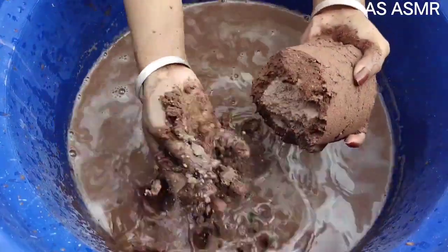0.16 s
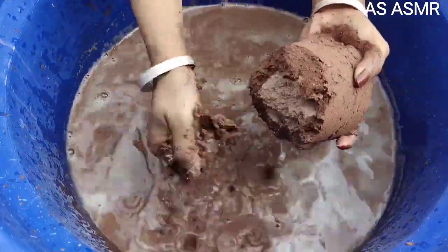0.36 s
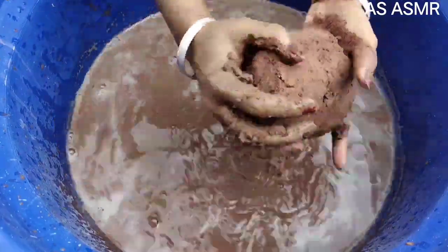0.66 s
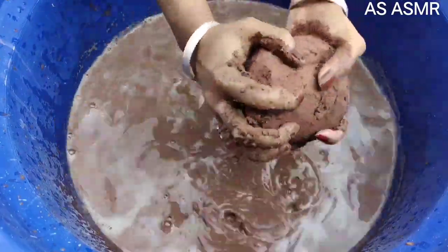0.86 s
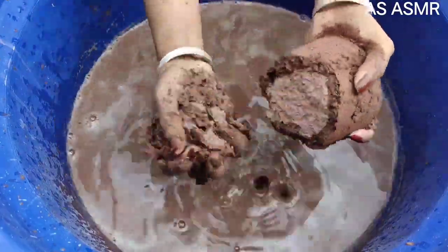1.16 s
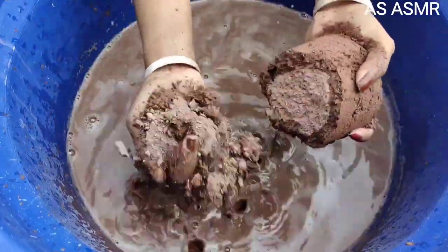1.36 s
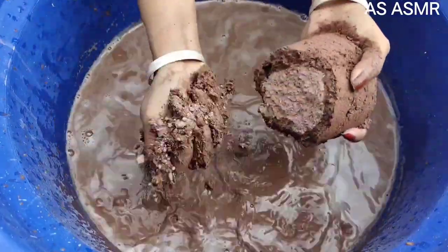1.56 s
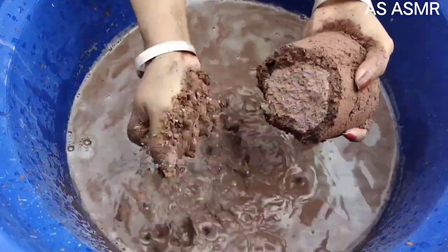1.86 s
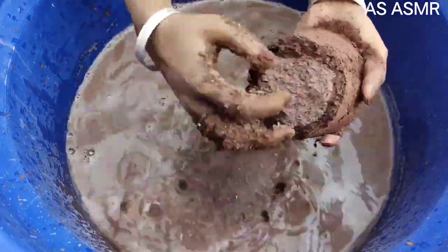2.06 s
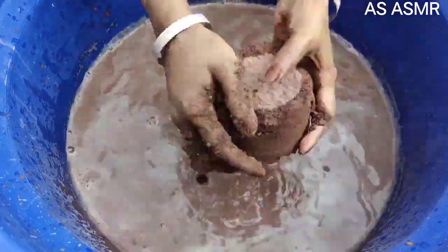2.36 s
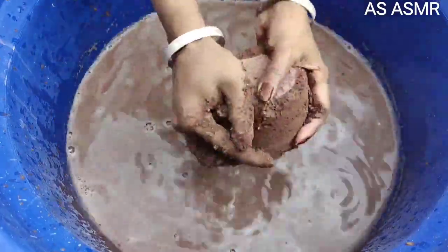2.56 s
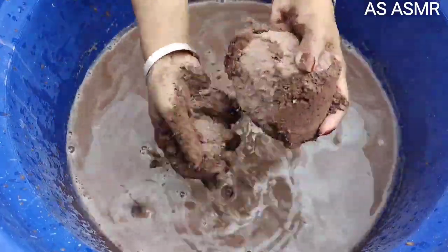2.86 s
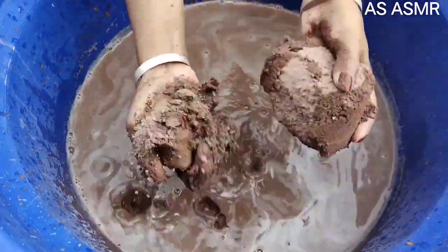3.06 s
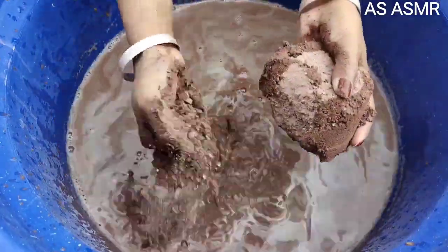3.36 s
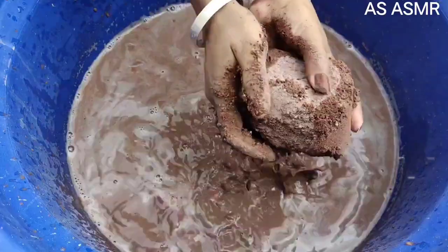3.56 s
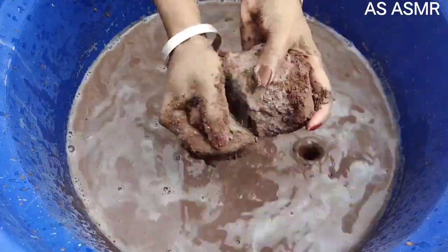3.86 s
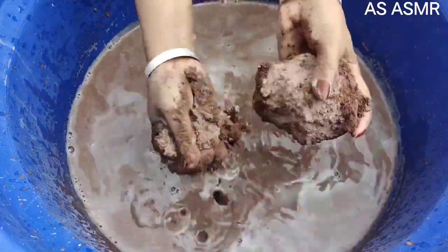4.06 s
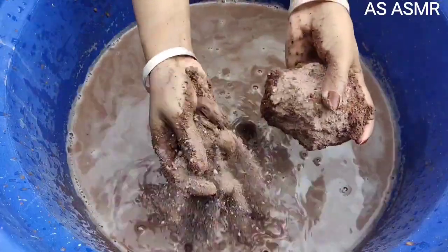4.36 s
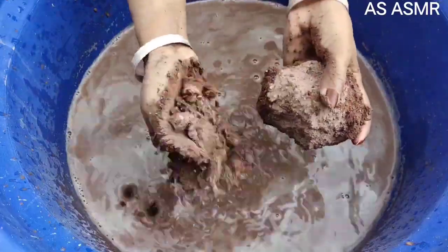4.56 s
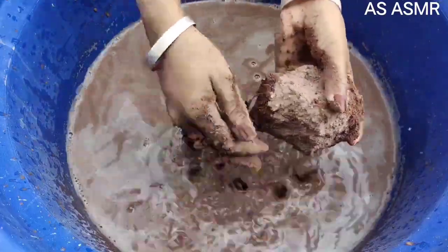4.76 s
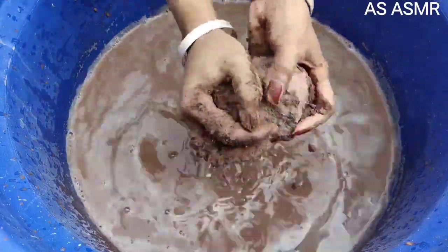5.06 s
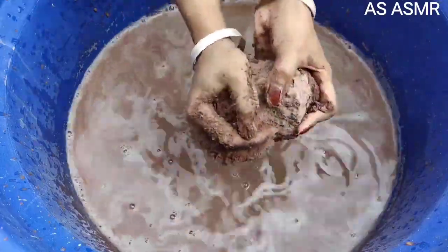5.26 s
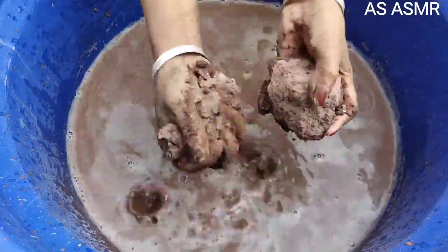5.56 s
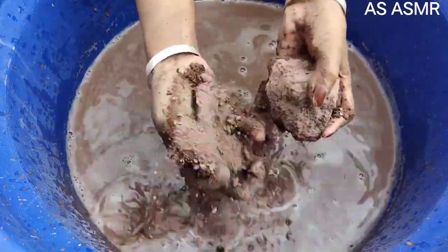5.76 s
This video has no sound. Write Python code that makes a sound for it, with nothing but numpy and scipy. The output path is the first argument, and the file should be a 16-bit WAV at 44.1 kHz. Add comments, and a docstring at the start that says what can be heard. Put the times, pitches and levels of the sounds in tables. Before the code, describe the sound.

Close, wet splatters and plops come in repeated bursts as bits of soil are broken off by hand and fall into a tub of water. Each handful brings small splashes, short ringing bubbles and a gritty trickle, then thins to soft crumbling and an occasional quick finger scrape before the next one falls. The plastic tub rings slightly, over a quiet distant rumble.

```python
"""Wet slaps and plops: lumps of wet soil are crumbled by hand over a plastic tub of muddy water.
Crumbs slap the surface and throw spray, and the air they drag under rings as short bubbles.
Grit hisses between the fingers, which now and then scrape over the lump. The air in the tub
rings along with all of it, over a low, steady rumble from afar."""
import sys
import numpy as np
from scipy import signal
from scipy.fft import rfft, irfft, next_fast_len
from scipy.io import wavfile
from scipy.ndimage import uniform_filter1d, map_coordinates

SR = 44100
rng = np.random.default_rng(int(sys.argv[2]) if len(sys.argv) > 2 else 0)


def master_out(mix):
    """Clip the mix to full scale and print it as 16-bit PCM to the path in sys.argv[1]."""
    frames = np.transpose(np.atleast_2d(mix))
    ceiling = np.clip(frames, -1, 1)
    pcm = np.round(ceiling * 32767).astype(np.int16)
    wavfile.write(sys.argv[1], SR, pcm)


N = 260631


# Crumbs hitting the water: start_s, level_db, pitch_hz, spray_db (added to level_db for the spray)
CRUMB_HITS = [(0.025, -17.5, 7400, -3), (0.028, -19, 6400, -7), (0.046, -17.5, 3160, -34),
              (0.06, -17.5, 3030, -11), (0.1018, -17, 3680, -7.5), (0.2086, -14, 3460, -8),
              (0.2588, -24, 5560, -3), (0.297, -20.5, 4600, -3.5), (0.3332, -17, 5000, -10.5),
              (0.365, -18.5, 3340, -30), (0.3879, -16, 3300, -19), (0.4391, -27, 5400, -10),
              (0.4476, -15, 6040, -10), (0.4798, -19, 2780, -26), (0.5199, -15, 5000, -12.5),
              (0.5754, -27, 4100, -9), (0.607, -23, 3900, -2), (0.634, -24, 2420, 1),
              (0.6859, -19, 6160, -3.5), (0.7476, -31, 3500, -4), (0.9112, -26, 3450, -39),
              (1.011, -29, 6000, -19), (1.2605, -31, 7040, -20), (1.3215, -23.5, 5540, -5),
              (1.3274, -19.5, 9100, -12.5), (1.4132, -21, 8900, -12), (1.4298, -13, 4530, -21),
              (1.4667, -15.5, 4800, -10), (1.4936, -18.5, 5250, -7), (1.5298, -15, 4800, -32),
              (1.5384, -26, 5500, -1), (1.5445, -18, 5800, -29), (1.6047, -16.5, 5070, -35),
              (1.7696, -17, 1970, -31.5), (1.7978, -12.5, 2380, -11), (1.8056, -24, 2400, -30),
              (1.8762, -14, 5000, -17), (1.9013, -14, 6660, -14.5), (1.927, -22, 6500, -16),
              (1.94, -16, 6700, -15), (1.9895, -16, 3920, -12), (2.0224, -16, 9400, -22),
              (2.058, -13.5, 8050, -11), (2.067, -22, 6500, -23), (2.1606, -23, 3680, -6),
              (2.177, -24.5, 3500, 0), (2.2209, -23, 3500, -17), (2.3207, -28, 7100, -14),
              (2.3797, -24.5, 3800, -8), (2.9543, -23.5, 2520, -10), (3.165, -32, 2980, 0.5),
              (3.2017, -22.5, 2880, -27), (3.2217, -17, 4600, -1), (3.228, -32, 6000, -28),
              (3.2482, -22.5, 7900, -36), (3.275, -28, 7000, -6), (3.314, -24, 3930, -15),
              (3.331, -27, 10000, -11), (3.338, -20.5, 4150, -2), (3.391, -19, 3960, -4),
              (3.47, -26, 9000, -17), (3.486, -20.5, 3120, -21), (3.5455, -20, 6600, -7),
              (3.577, -23, 4240, -15), (3.621, -23, 7000, -8), (3.6377, -24, 5300, 5),
              (3.6588, -30, 2700, -4), (3.678, -16, 4300, -8.5), (3.73, -24.5, 3900, -0.5),
              (4.0227, -21, 6400, -15), (4.4074, -15.5, 2530, -38), (4.4698, -21, 2470, -22),
              (4.5187, -24, 3620, -15), (4.5365, -17.5, 2650, -4.5), (4.572, -18, 2600, -32),
              (4.621, -30, 3900, -0.5), (4.707, -17, 3650, -8.5), (4.7704, -21, 3200, -7.5),
              (4.8108, -25.5, 4870, -10), (4.836, -27, 4000, -6), (4.8486, -18, 3900, -10),
              (4.8865, -18, 3600, -2.5), (4.912, -30, 5960, -2), (4.931, -16, 6600, -12),
              (4.9515, -18, 3570, -13), (4.9675, -22, 3180, -1), (4.992, -24, 5900, -9),
              (5.019, -23.5, 2480, -6), (5.074, -23.5, 5100, -10.5), (5.21, -31, 2080, -13),
              (5.618, -30, 2430, -7), (5.6981, -21.5, 7500, -23), (5.7552, -28, 4950, -3),
              (5.8388, -22, 3570, -5), (5.854, -30, 3400, -21), (5.884, -19, 8800, -39),
              (5.901, -12.5, 2310, -40)]

def slaps():
    """A crumb hits the water: a sharp snap, a low push, a short ring, then a burst of spray."""
    start_s, level_db, pitch_hz, spray_db = np.transpose(CRUMB_HITS)[:, :, None]
    starts = start_s[:, 0]
    t = np.arange(200) / SR
    burst = amp(-60 * t / 0.0012) * rng.standard_normal((len(starts), len(t)))
    crack = place(starts, amp(level_db) * burst / np.linalg.norm(burst, axis=1, keepdims=True))
    pulse_time = t * pitch_hz * 4.8  # a brighter crumb makes a shorter pulse
    pulse = pulse_time * (pulse_time - 2) * np.exp(-pulse_time)
    snap = place(starts, amp(level_db + 4.5) * pulse) + amp(14) * crack
    push = filtered(abs(crack), lambda hz: resonance(hz, pitch_hz=270, width_hz=280, gain_db=16.5))
    ring = air_pockets(starts, level_db[:, 0] + 6.5, pitch_hz[:, 0], cycles=0.0047 * pitch_hz[:, 0],
                       rise=0.11, waver=1.0, samples=300)
    t = np.arange(2000) / SR
    fade_in = 1 - np.exp(-t / 0.002)
    spray = place(starts, amp(level_db + spray_db + 9.5 - 60 * t / 0.019) * fade_in)
    droplets = amp(3.5 * wobble(600))
    return snap + push + ring + spray * droplets * spray_noise()


# Air trapped under the water: start_s, level_db, pitch_hz
TRAPPED_AIR = [(0.029, -25, 1330), (0.045, -18, 255), (0.047, -16, 847), (0.0805, -19.5, 890),
               (0.0845, -11.5, 630), (0.101, -22, 2000), (0.102, -16, 536), (0.208, -17, 745),
               (0.259, -18.5, 1075), (0.295, -15.5, 450), (0.296, -17, 990), (0.368, -14, 1170),
               (0.389, -12.5, 776), (0.448, -19, 1220), (0.479, -25, 2170), (0.519, -12.5, 880),
               (0.536, -19.5, 930), (0.559, -13.5, 1200), (0.607, -12.5, 735), (0.62, -18, 1350),
               (0.63, -17, 1310), (0.634, -15, 540), (0.635, -11.5, 2150), (0.649, -19.5, 1840),
               (0.686, -21.5, 575), (0.747, -21, 600), (0.9105, -10.5, 785), (1.429, -17, 574),
               (1.437, -17, 625), (1.492, -20, 1030), (1.538, -20, 795), (1.564, -16.5, 920),
               (1.655, -20.5, 1460), (1.761, -25, 1720), (1.771, -12, 1726), (1.7975, -12, 810),
               (1.804, -12.5, 860), (1.846, -30, 2250), (1.861, -23, 3830), (1.881, -25, 2300),
               (1.918, -17, 950), (1.936, -21, 1660), (1.964, -19.5, 1740), (1.989, -22.5, 1450),
               (2.009, -25, 1190), (2.04, -23, 1030), (2.121, -11, 582), (2.165, -19.5, 3100),
               (2.185, -20.5, 910), (2.227, -18.5, 1180), (2.23, -19.5, 3070), (2.241, -15, 594),
               (2.473, -30.5, 1970), (2.927, -18, 1730), (2.951, -18, 920), (2.954, -17.5, 565),
               (3.049, -29.5, 1400), (3.068, -21.5, 1015), (3.226, -22, 1950), (3.34, -16, 916),
               (3.391, -22, 1850), (3.452, -20.5, 990), (3.486, -20.5, 945), (3.514, -21.5, 2000),
               (3.524, -25, 2840), (3.534, -20, 1370), (3.545, -15, 467), (3.57, -22, 1560),
               (3.646, -17.5, 1090), (3.654, -16, 1560), (3.677, -12.5, 695), (3.707, -21.5, 2200),
               (3.73, -15.5, 1600), (3.767, -21.5, 1870), (4.022, -22.5, 1126), (4.096, -28, 3100),
               (4.249, -27.5, 1790), (4.335, -26, 1800), (4.408, -13, 647), (4.409, -15, 830),
               (4.46, -24, 1770), (4.469, -23, 1320), (4.487, -21, 1080), (4.518, -20, 1450),
               (4.537, -15.5, 1730), (4.571, -18, 1830), (4.722, -20.5, 572), (4.77, -13.5, 2340),
               (4.837, -20.5, 2830), (4.848, -17.5, 1440), (4.872, -27, 2580), (4.887, -15.5, 1054),
               (4.887, -14.5, 1900), (4.888, -18.5, 530), (4.931, -24, 1260), (4.94, -14, 970),
               (4.953, -17, 1830), (4.967, -23, 900), (5.017, -14, 845), (5.019, -18, 1750),
               (5.208, -24.5, 1000), (5.245, -21.5, 1236), (5.578, -32.5, 1300), (5.698, -24.5, 1860),
               (5.839, -19.5, 1950), (5.855, -19, 3130), (5.881, -22, 270), (5.9, -19, 486),
               (5.901, -17, 1170)]

def bubbles():
    """Each large air pocket plops, with a ragged puff of churned water."""
    start_s, level_db, pitch_hz = np.transpose(TRAPPED_AIR)
    cycles = 20.6 * (pitch_hz / 1000) ** 0.6  # higher bubbles ring for more cycles
    plop = air_pockets(start_s, level_db, pitch_hz, cycles, rise=0.055, waver=0.53, samples=2200)
    plop_loudness = abs(signal.hilbert(plop, next_fast_len(N))[:N])
    churn = amp(-19) * plop_loudness * amp(3.1 * wobble(350)) * spray_noise()
    # a smaller pocket breaks off and rings along
    lag, higher = rng.random((len(start_s), 2)).T
    small_plop = air_pockets(start_s + 0.005 * lag, level_db - 5.5, pitch_hz * (1.255 + 1.35 * higher),
                             0.74 * cycles, rise=0.11, waver=0.67, samples=1200)
    return plop + churn + small_plop


def air_pockets(start_s, level_db, pitch_hz, cycles, rise, waver, samples):
    """Fading tones that climb as a pocket nears the surface and waver as its wall shakes."""
    turns = pitch_hz[:, None] * np.arange(samples) / SR
    age = turns / cycles[:, None]  # at age 1 the tone has faded by 60 dB
    swell = 1 - np.exp(-turns / 0.16)
    shake = waver * np.sin(2 * np.pi * (turns / 3.72 + rng.random((len(start_s), 1))))
    phase = 2 * np.pi * turns * (1 + rise * np.minimum(age, 1)) + shake
    return place(start_s, amp(level_db[:, None] - 60 * age) * swell * np.sin(phase))


# The tone of spray, from low to high: pitch_hz, level_db
SPRAY_TONE = [(200, -12), (800, 0), (2000, 2.5), (5000, 0.5), (9000, -6.5), (15000, -20.5)]

def spray_noise():
    """The wet hiss used for spray, churned water and scrapes."""
    return noise(SPRAY_TONE)


# Grit dropped or rubbed loose in one go: start_s, end_s, start_level_db, end_level_db
GRIT_POURS = [(0.019, 0.483, -37, -36), (0.566, 0.658, -35.5, -35.5), (0.77, 1.15, -45, -47.5),
              (1.234, 1.453, -40.5, -35), (1.552, 1.725, -31.5, -39.5), (1.754, 2.095, -40.5, -35),
              (2.16, 2.246, -35.5, -38.5), (2.293, 2.526, -46.5, -46), (2.603, 2.94, -48.5, -45.5),
              (3.033, 3.578, -40.5, -37), (3.599, 3.664, -36, -30.5), (3.718, 3.844, -41.5, -49),
              (3.957, 4.055, -38.5, -49.5), (4.171, 4.388, -35.5, -44.5), (4.434, 4.742, -37.5, -42),
              (4.775, 5.035, -41, -41.5), (5.105, 5.317, -52.5, -48.5), (5.645, 5.95, -39.5, -39)]

def grit_flow_db():
    """How loudly grit falls: a steady trickle, the pours, and a short shower with each slap."""
    trickle_db, shower_db = -55.5, -29.5
    onset_db_per_s, stop_db_per_s, settle_s = 387, 483, 0.023
    t = np.arange(N) / SR
    power = amp(trickle_db) ** 2
    for start_s, end_s, start_db, end_db in GRIT_POURS:
        fade_db = onset_db_per_s * np.maximum(start_s - t, 0) + stop_db_per_s * np.maximum(t - end_s, 0)
        power = power + amp(np.interp(t, [start_s, end_s], [start_db, end_db]) - fade_db) ** 2
    slap_s, slap_db = np.transpose(CRUMB_HITS)[:2]
    shower = amp(slap_db[:, None] + shower_db - 20 * t[:SR // 5] / settle_s)
    return 10 * np.log10(power + place(slap_s, shower ** 2))


# The tone of falling grit: pitch_hz, level_db
GRIT_TONE = [(300, -8.5), (600, -5.5), (1640, -2), (2670, -3.5), (5270, -1.5), (9320, -8), (14800, -12.5)]

def grit():
    """Fine grit hisses in patches while tiny crumbs plip into the water, more often as more falls."""
    flow_db = grit_flow_db()
    spectrum = signal.stft(noise(GRIT_TONE), nperseg=128)[2]
    patches = uniform_filter1d(rng.standard_normal(spectrum.shape), size=5, axis=0)  # blur across pitch
    patches = uniform_filter1d(patches, size=5, axis=1)  # and across time
    hiss = unit(signal.istft(spectrum * amp(3.4 * unit(patches)), nperseg=128)[1][:N])
    hiss = amp(flow_db - 2.5 + 2.9 * wobble(60)) * hiss
    when, size, pitch, life, chance = rng.random((3500, 5)).T
    start_s = when * (N - 1) / SR
    flow_then_db = flow_db[(start_s * SR).astype(int)]
    falls = chance < np.clip((flow_then_db + 62) / 26, 0, 1)
    level_db = np.where(falls, flow_then_db + 3 + 11 * size ** 3.5, -200)  # many small, few large
    pitch_hz = 1700 * amp(16 * pitch)
    cycles = 7 + 30 * life ** 3.5
    return hiss + air_pockets(start_s, level_db, pitch_hz, cycles, rise=0.11, waver=0.19, samples=400)


# Fingers scraping over the lump: start_s, length_s, level_db
FINGER_STROKES = [(1.028, 0.029, -39.5), (2.457, 0.03, -40), (2.696, 0.041, -43), (2.814, 0.043, -34),
                  (5.432, 0.039, -37.5)]

def scrapes():
    """Each finger stroke is a quick gritty rasp that swells and fades."""
    start_s, length_s, level_db = np.transpose(FINGER_STROKES)[:, :, None]
    progress = np.clip(np.arange(3500) / SR / length_s, 0, 1)
    swell = np.sqrt(abs(np.sin(np.pi * progress ** 0.52)))
    strokes = place(start_s[:, 0], amp(level_db) * swell)
    return strokes * amp(0.67 * wobble(590)) * spray_noise()


# The notes at which the air in the tub rings: pitch_hz, width_hz, gain_db
TUB_NOTES = [(549, 47.4, 7), (849, 47, -0.5), (1420, 580, -10), (1836, 50, -4.5)]

def tub(sound):
    """The sound itself plus the ringing it stirs up in the tub's air."""
    return filtered(sound, lambda hz: 1 + sum(resonance(hz, *note) for note in TUB_NOTES))


# The tone of the distant rumble: pitch_hz, level_db
RUMBLE_TONE = [(15, -30), (25, -1), (50, -2.5), (95, -2.5), (226, 1), (280, -2.5), (390, -18.5),
               (553, -12.5), (800, -28.5), (3000, -37), (15000, -40)]

def rumble():
    """A low, steady noise from afar."""
    return amp(-39) * noise(RUMBLE_TONE)


def amp(db):
    """Turn decibels into a number to multiply by."""
    return 10 ** (np.asarray(db) / 20)


def unit(sound):
    """Scale a sound to an average strength (rms) of 1."""
    return sound / np.sqrt(np.mean(sound ** 2) + 1e-20)


def resonance(hz, pitch_hz, width_hz, gain_db):
    """A filter curve that favours one pitch; the narrower it is, the longer it rings."""
    return amp(gain_db) * 1j * hz * width_hz / (pitch_hz ** 2 - hz ** 2 + 1j * hz * width_hz)


def filtered(sound, curve):
    """Multiply each frequency in a sound by curve(hz)."""
    size = next_fast_len(N + 8192)
    return irfft(rfft(sound, size) * curve(np.fft.rfftfreq(size, 1 / SR)), size)[:N]


def noise(tone):
    """Noise of strength 1, shaped by rows of pitch_hz, level_db."""
    pitch_hz, level_db = np.transpose(tone)
    white = rng.standard_normal(N)
    return unit(filtered(white, lambda hz: amp(np.interp(np.log(hz + 1), np.log(pitch_hz), level_db))))


def wobble(points_per_s):
    """A smooth curve through random points."""
    points = rng.standard_normal(int(N * points_per_s / SR) + 4)
    return map_coordinates(points, [np.arange(N) * points_per_s / SR])


def place(start_s, sounds):
    """Add short sounds, one per row, into one track at their start times."""
    positions = np.round(start_s * SR).astype(int)[:, None] + np.arange(sounds.shape[1])
    return np.bincount(positions.ravel(), sounds.ravel(), N + SR)[:N]


def scene():
    """All the crumbling rings the air in the tub; the rumble lies behind it."""
    background = rumble()
    crumbling = amp(2.5) * bubbles() + slaps() + grit() + scrapes()
    return (tub(crumbling) + background)[None]


def record(dry):
    """The top treble softens and falls away steeply, ending at top_hz; sharp peaks are rounded off."""
    top_hz = 16600
    soft = filtered(dry[0], lambda hz: 1 / (1 + (hz / 14000) ** 4) / (1 + (hz / 15500) ** 40))
    rounded = soft / (1 + abs(soft / 2.3) ** 4) ** 0.16
    return filtered(rounded, lambda hz: hz < top_hz)[None]


dry = scene()
out = record(dry)
master_out(out)
```